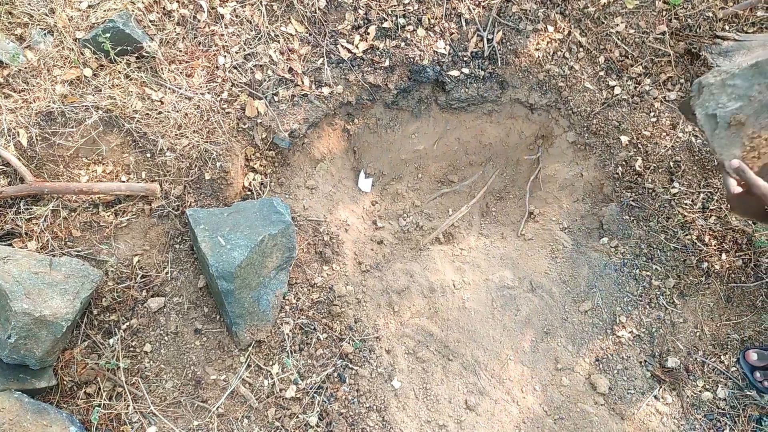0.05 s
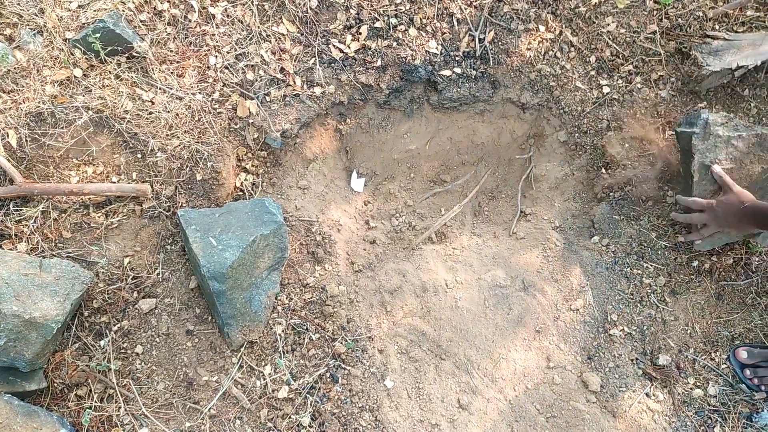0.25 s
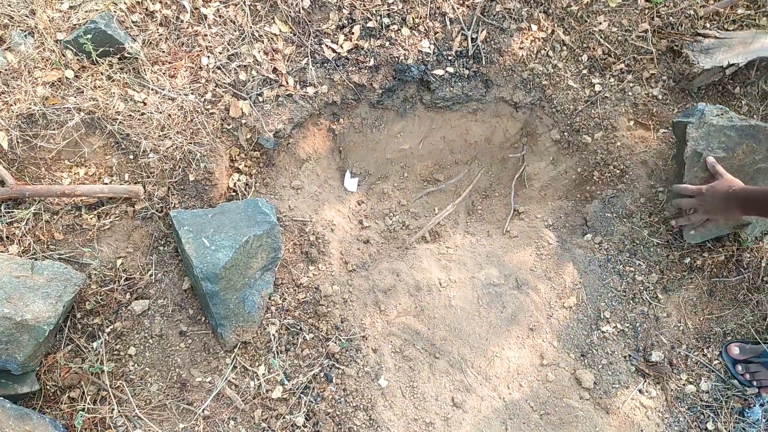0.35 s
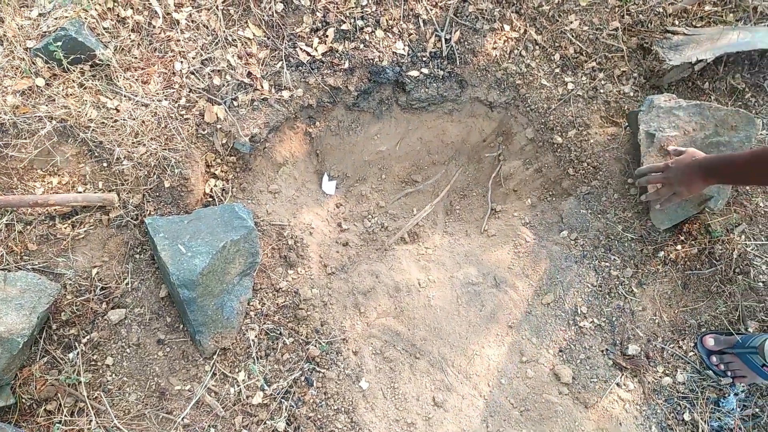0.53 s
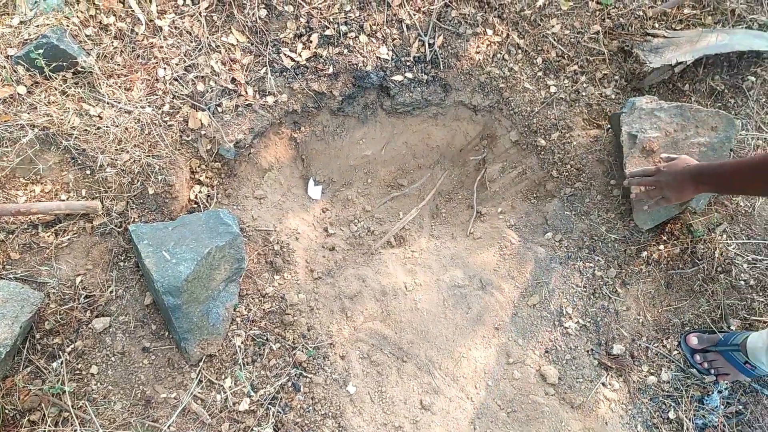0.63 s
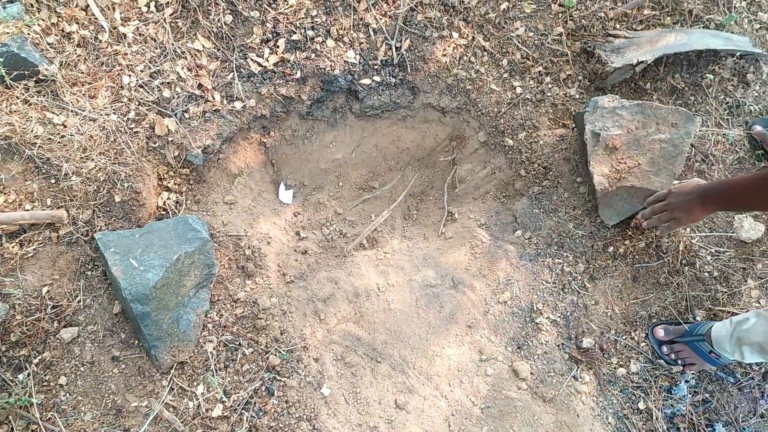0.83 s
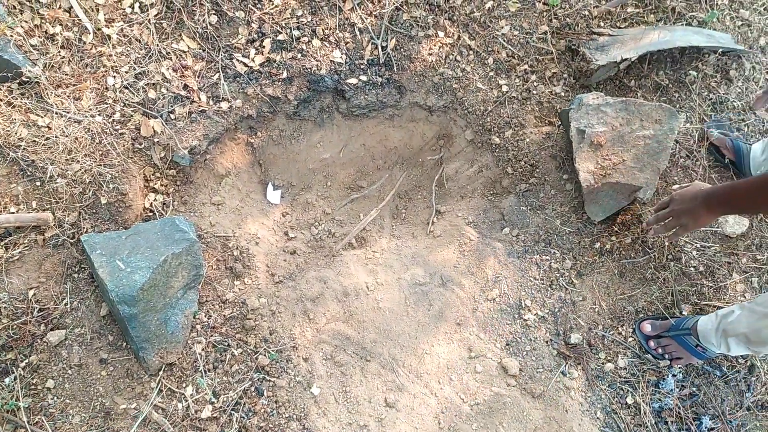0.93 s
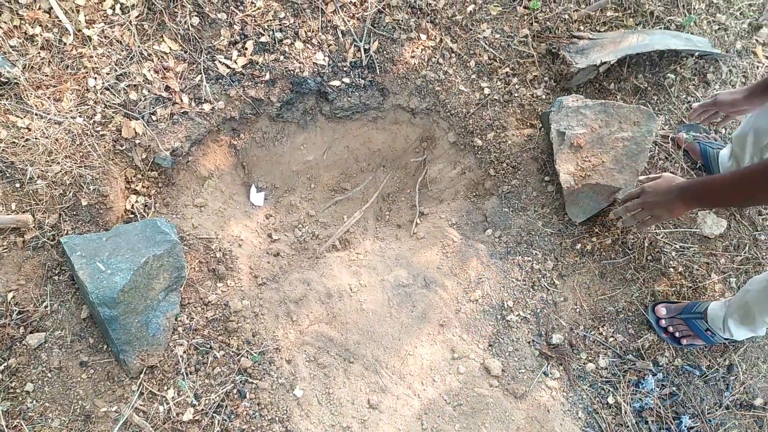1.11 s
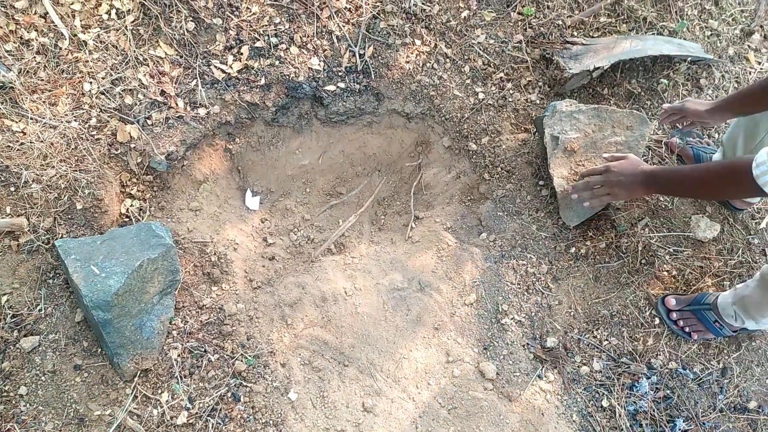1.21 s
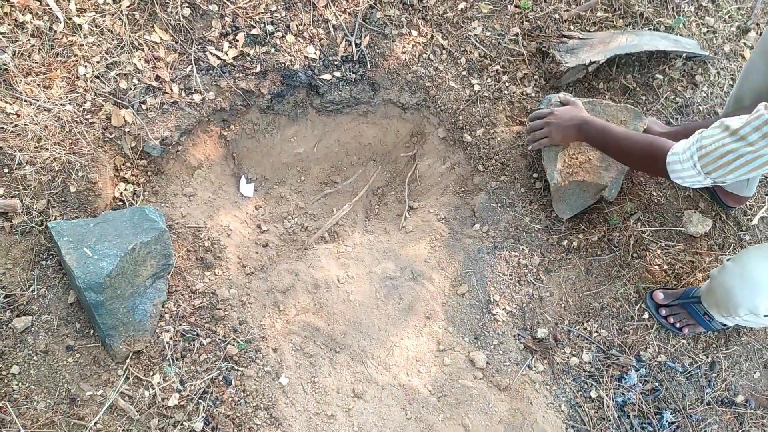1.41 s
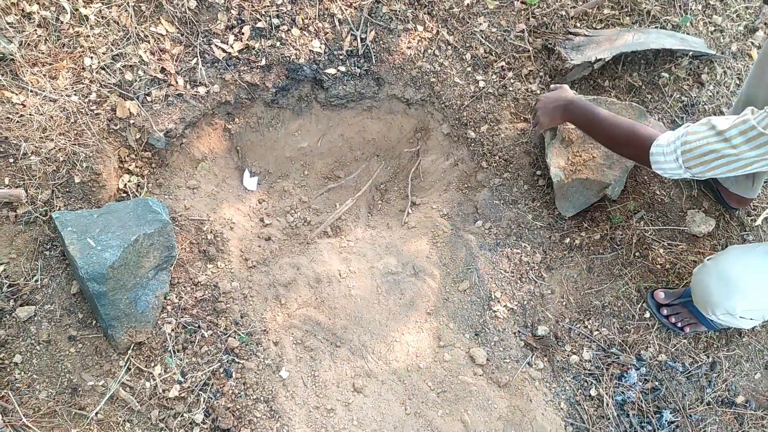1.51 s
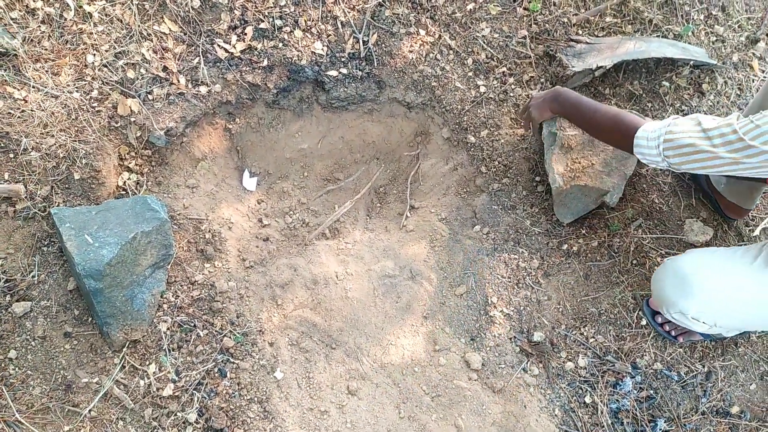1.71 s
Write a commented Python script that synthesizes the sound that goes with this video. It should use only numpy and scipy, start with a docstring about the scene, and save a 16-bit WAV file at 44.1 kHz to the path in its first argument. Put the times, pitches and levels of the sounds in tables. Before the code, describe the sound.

Outdoors, a heavy stone thuds onto dry ground near the microphone, then scuffs and knocks on pebbles amid snapping twigs and rustling leaves and cloth. Handling bumps hit the microphone right, then left, with faint birds far off.

```python
"""A crunch and a thud, close by: a heavy stone tips onto dry, leafy ground and rocks back once.
The soil gives under it and damps its ringing. As it is shifted, twigs and grit snap to the right,
pebbles clink and a foot scuffs, amid rustling leaves and cloth. Fingers bump the two microphone
ports, each touch almost only on its own side. Far off, small birds chirp over the outdoor hush."""
import sys
import numpy as np
from scipy import signal
from scipy.fft import rfft, irfft, next_fast_len
from scipy.io import wavfile
from scipy.ndimage import uniform_filter1d

SR = 44100
rng = np.random.default_rng(int(sys.argv[2]) if len(sys.argv) > 2 else 0)


def wrap_up_sound(samples):
    """Save the sound to the file named by the first command line argument, as 16-bit audio."""
    columns = np.atleast_2d(samples).T
    # keep every value between -1 and 1, then stretch to whole-number steps
    tamed = np.clip(columns, -1, 1)
    steps = np.round(tamed * 32767).astype(np.int16)
    wavfile.write(sys.argv[1], SR, steps)


N = 77175


def amp(db):
    """Decibels to gain."""
    return 10 ** (np.asarray(db) / 20)


def unit(x):
    """Scale to rms 1."""
    return x / np.sqrt(np.mean(x ** 2) + 1e-20)


def along(points, hz):
    """Read a curve of (f/Hz, value) points on a log frequency axis."""
    f, value = np.transpose(points)
    return np.interp(np.log(hz + 1), np.log(f + 1), value)


def clock():
    """Seconds at every sample."""
    return np.arange(N) / SR


def filtered(x, response):
    """Shape x by a gain given as a function of frequency."""
    size = next_fast_len(N + 8192)
    return irfft(rfft(x, size) * response(np.fft.rfftfreq(size, 1 / SR)), size)[..., :N]


def add(track, at, sound):
    """Mix a sound in at a time in seconds."""
    start = max(0, round(at * SR))
    track[..., start:] += sound[..., :N - start]


def pan(db):
    """Port gains for a level difference, left minus right."""
    return amp([[db / 2], [-db / 2]])


def strike(rise, t60):
    """Envelope of an impact: linear rise, exponential fall, both in seconds."""
    t = clock()
    return np.minimum(t / rise, 1) * amp(-60 * np.maximum(t - rise, 0) / t60)


def grains(spectrum, spiky_db, rate=1500):
    """Stereo noise of rms 1, made of tiny grains of uneven size, `rate` of them a second."""
    # likeness of the sound at the two ports: f/Hz, correlation
    likeness = [(60, 0.47), (250, 0.77), (1000, 0.49), (2500, 0.13), (10000, 0.083)]
    knots = rng.standard_normal(int(N * rate / SR) + 4)
    size = amp(spiky_db * np.interp(clock() * rate, np.arange(len(knots)), knots))

    def mid_side_gains(hz):
        width = np.arccos(np.clip(along(likeness, hz), -1, 1)) / 2
        return amp(along(spectrum, hz)) * [np.cos(width), np.sin(width)]

    mid, side = filtered(size * rng.standard_normal((2, N)), mid_side_gains)
    return unit(np.array([mid + side, mid - side]))


def push(hz, t60):
    """A soft, quickly damped low swing."""
    return -np.sin(2 * np.pi * hz * clock()) * strike(0.00226, t60)


def ring(hz, t60):
    """One damped mode."""
    return np.sin(2 * np.pi * hz * clock()) * strike(0.00041, t60)


def snap(hz, rise, spread_hz, low_cut_hz=3060):
    """A millisecond of bright ringing with unsteady pitch."""
    t = clock()
    age = t / rise
    envelope = (age / 2) ** 2 * np.exp(2 - age)
    phase_drift = np.cumsum(rng.standard_normal(N)) * np.sqrt(2 * np.pi * spread_hz / SR)
    burst = envelope * np.sin(2 * np.pi * hz * t + phase_drift)
    return filtered(burst, lambda f: f ** 2 / (f ** 2 + low_cut_hz ** 2))


def patchy(x, depth_db=2.5):
    """Narrow bands swell and fade at random."""
    bands = signal.stft(x, nperseg=512)[2]
    swell = uniform_filter1d(rng.standard_normal(bands.shape[1:]), size=3, axis=0)  # across frequency
    swell = uniform_filter1d(swell, size=9, axis=1)  # across time
    return signal.istft(bands * amp(depth_db * unit(swell)), nperseg=512)[1][:, :N]


def outdoor_hush():
    """Open air all round the microphone: a low rumble under a faint hiss."""
    # colour of the hush: f/Hz, relative level/dB
    air = [(20, 31), (70, 19), (150, 5), (300, 0), (550, 12), (800, -8.5), (1400, -35.5), (2200, -7),
           (3500, -5.5), (6000, -7.5), (9500, 0.5), (16000, -10)]
    return amp(-52) * grains(air, spiky_db=3.0)


def far_birds(chirp_s=0.05, flutter_depth=0.6):
    """Thin gliding chirps from far off, fluttering on their way through the trees."""
    # bird calls: t/s, start f/Hz, end f/Hz, level/dB
    chirps = [(.108, 4200, 4800, -47.5), (0.146, 7200, 7250, -52), (0.279, 4050, 4700, -57),
              (0.467, 4180, 4900, -53), (.605, 5040, 4200, -54), (0.668, 4200, 4800, -54),
              (0.851, 4200, 4800, -51), (1.221, 6700, 7100, -51), (1.274, 6930, 6500, -51),
              (1.435, 4000, 5200, -77)]
    out = np.zeros(N)
    progress = np.minimum(clock() / chirp_s, 1)
    for at, start_hz, end_hz, db in chirps:
        hz = start_hz + (end_hz - start_hz) * progress
        chirp = np.sin(np.pi * progress) * np.sin(2 * np.pi * np.cumsum(hz) / SR)
        flutter = 1 + flutter_depth * unit(filtered(rng.standard_normal(N), lambda f: f < 200))
        add(out, at, amp(db) * flutter * chirp)
    return out


def movement():
    """Near the microphone, leaves rustle, a hand slides and cloth shuffles as the stone is handled."""
    # loudness of leaf litter, hand and cloth: t/s, level/dB
    leaf_levels = [(0, -42.5), (.06, -42), (.18, -44), (.27, -37), (.35, -45.5), (.5, -47.5), (.6, -51.5),
                   (.85, -52.5), (1.1, -48), (1.3, -48.5), (1.4, -54), (1.75, -51.5)]
    hand_levels = [(0, -45), (.15, -46.5), (.3, -50), (.6, -55), (.82, -52.5), (.92, -47.5), (1.0, -44),
                   (1.12, -44.5), (1.2, -47.5), (1.33, -57), (1.5, -53), (1.62, -54.5), (1.75, -73)]
    cloth_levels = [(0, -43), (.15, -57.5), (.3, -57), (.42, -55.5), (.9, -60.5), (1.0, -51.5), (1.2, -46),
                    (1.28, -41.5), (1.36, -46), (1.46, -52.5), (1.75, -52.5)]
    # their colours: f/Hz, relative level/dB
    leaf_colour = [(200, 3), (1500, -1.5), (3500, -6.5), (6000, 3), (9500, 4.5), (12000, -0.5),
                   (16000, -13)]
    hand_colour = [(200, -5.5), (1400, -5), (1900, 5), (2800, 2.5), (3700, -0.5), (4300, 2.5), (5200, 1),
                   (6200, -30), (16000, -21)]
    cloth_colour = [(30, -11.5), (120, -3.5), (270, 4), (700, -4.5), (1150, -1), (1600, -9), (2600, 1.5),
                    (4000, -21), (16000, -40)]
    gain = lambda levels: amp(np.interp(clock(), *np.transpose(levels)))
    leaves = gain(leaf_levels) * grains(leaf_colour, spiky_db=3, rate=980)
    hand = gain(hand_levels) * grains(hand_colour, spiky_db=3)
    cloth = gain(cloth_levels) * grains(cloth_colour, spiky_db=4, rate=200)
    return patchy(leaves + hand + cloth)


def fingers_on_ports(crosstalk_db=-27):
    """Handling noise on the microphone: each touch is heard almost only in the port next to it."""
    # finger bumps: t/s, rasp level/dB, rasp t60/s, port (0 left, 1 right),
    # push f/Hz, push level/dB, rasp dull above f/Hz
    bumps = [(1.1285, -27.5, 0.028, 1, 202, -24.5, 900), (1.142, -37, 0.05, 1, 158, -21, 700),
             (1.22, -25, 0.015, 1, 206, -36, 6000), (1.2235, -16.5, 0.015, 1, 223, -20, 9000),
             (1.237, -25, 0.05, 1, 130, -22, 5000), (1.246, -18, 0.015, 1, 376, -17.5, 2200),
             (1.252, -30, 0.15, 1, 192, -22.5, 3000), (1.363, -47, 0.056, 0, 90, -33, 600),
             (1.386, -25.5, 0.0061, 0, 297, -33.5, 6000), (1.4169, -29, 0.015, 0, 312, -43, 3000),
             (1.572, -38, 0.026, 1, 166, -39.5, 1000)]
    # fingernail clicks at the left port: t/s, level/dB, f/Hz
    clicks = [(1.3828, -12.5, 10500), (1.3858, -20, 4300), (1.4078, -32, 10400), (1.4128, -27, 10400),
              (1.4151, -9.5, 10630)]
    # colours of the touched case and of the nail: f/Hz, relative level/dB
    case = [(50, -7), (220, -0.5), (600, 0.5), (850, -5), (1500, -4.5), (2400, -1), (3300, -17),
            (6000, -37), (16000, -28)]
    nail = [(200, -11), (1500, -2), (4000, 1.5), (8000, -3), (16000, -20)]
    out = np.zeros((2, N))
    for at, db, t60, port, hz, push_db, dull_hz in bumps:
        friction = grains(case, spiky_db=0.5)[0]
        dulled = unit(filtered(friction, lambda f: 1 / np.hypot(1, f / dull_hz)))
        rasp = amp(db) * strike(0.00048, t60) * dulled
        add(out[round(port)], at, rasp + amp(push_db) * push(hz, t60=0.023))
    for at, db, hz in clicks:
        body = amp(-16) * strike(0.00018, t60=0.0082) * grains(nail, spiky_db=4.5)[0]
        tick = snap(hz, rise=0.0002, spread_hz=2400)
        add(out[0], at, amp(db) * (tick + body))
    return out + amp(crosstalk_db) * out[::-1]


def ground_scatter(hz, rise):
    """The ground's brief answer to a snap: a tail of noise around its pitch."""
    band = lambda f: 1 / np.hypot(1, 1.8 * (f / hz - hz / (f + 1)))
    noise = unit(filtered(rng.standard_normal(N), band))
    return amp(-14) * noise * strike(rise, t60=0.019)


def twigs(rise_s=0.00019, left_lag_s=0.00036, left_db=-5.5):
    """Twigs and grit snap to the right, reaching the left port later and weaker."""
    # snaps at the right port: t/s, level/dB, f/Hz
    snaps = [(0.06, -31, 8950), (0.109, -37, 9400), (.2468, -21, 9150), (.277, -23, 9800),
             (0.2906, -23, 7640), (0.3061, -20, 9300), (.4195, -27, 9200), (.464, -36, 9600),
             (.4895, -29.5, 9700), (0.6312, -23, 9200), (0.664, -25.5, 9900), (0.6713, -27, 9900),
             (0.7025, -21, 9560), (0.7138, -22, 8600), (0.7139, -17.5, 8100), (0.7405, -17.5, 7040),
             (.7657, -20, 9450), (0.7832, -13.5, 9380), (0.8048, -17, 9600), (.8255, -19, 8660),
             (0.838, -21, 8800), (0.8442, -28, 9000), (0.8467, -20.5, 9000), (1.179, -35, 10100),
             (1.2996, -29, 10400)]
    out = np.zeros((2, N))
    for at, db, hz in snaps:
        tick = snap(hz, rise_s, spread_hz=1620)
        add(out[0], at + left_lag_s, amp(db + left_db) * (tick + ground_scatter(hz, rise_s)))
        add(out[1], at, amp(db) * (tick + ground_scatter(hz, rise_s)))
    return out


def stone_ringing(spread_db=1.5):
    """Stone and pebbles ring briefly in the centre, damped by the soil."""
    # the stone's edges strike: t/s, level/dB
    strikes = [(0.1959, -42.5), (.2015, -25.5), (.209, -24), (0.2134, -27)]
    # modes of stone and packed soil: f/Hz, relative level/dB, t60/s
    modes = [(216, 0, 0.052), (338, -4, .07), (383, -3.5, .06), (621, -7, 0.079), (730, -13, 0.056),
             (900, -5, 0.043), (1117, -9, 0.056), (1726, -9, 0.052), (1870, -25, 0.03)]
    # pebbles clink: t/s, level/dB, f/Hz, t60/s
    clinks = [(.7949, -28, 2215, 0.026), (0.7954, -40, 1090, 0.021), (1.2625, -28, 1096, .02),
              (1.281, -27, 1110, 0.023)]
    out = np.zeros(N)
    for at, db in strikes:
        for hz, mode_db, t60 in modes:
            add(out, at, amp(db + mode_db + rng.normal(0, spread_db)) * ring(hz, t60))
    for at, db, hz, t60 in clinks:
        add(out, at, amp(db) * ring(hz, t60))
    return out


def stone_on_ground():
    """Close to the microphone, the stone thuds, crushes the soil, scuffs and knocks on pebbles."""
    # the soil gives under the stone: t/s, level/dB, f/Hz, t60/s
    thuds = [(0.2033, -18, 206, 0.028), (0.2062, -23, 114, 0.01), (0.218, -16, 260, 0.0177),
             (0.23, -12, 72, 0.1), (0.2292, -26.5, 115.7, 0.14), (0.312, -41, 71, .2),
             (0.516, -41.5, 193, 0.14), (0.5308, -27.5, 68, 0.13)]
    # soil is crushed: t/s, level/dB, rise/s, t60/s
    crushes = [(.200, -26.5, 0.0015, 0.057), (.209, -22.5, 0.0017, 0.066), (0.266, -43.5, .012, 0.11),
               (.512, -43.5, 0.0036, 0.21)]
    # gritty scuffs: t/s, level/dB, rise/s, t60/s, left minus right/dB
    scuffs = [(0.019, -39, 0.0069, 0.11, -6), (.058, -35.5, .003, 0.077, 0),
              (.194, -26.5, 0.006, 0.076, -2.5), (.209, -27, 0.00089, 0.048, -1),
              (0.809, -42, 0.019, 0.33, 0), (1.053, -42, 0.007, 0.25, -2), (1.22, -36, 0.0023, 0.12, -6),
              (1.237, -35.5, 0.0033, 0.22, -3.5), (1.52, -41.5, 0.0077, .04, -12),
              (1.575, -51.5, 0.016, 0.066, -19.5)]
    # hard knocks against pebbles: t/s, level/dB, t60/s, left minus right/dB
    knocks = [(0.7946, -29, 0.048, 0), (1.281, -45, 0.02, 3), (1.316, -42, 0.014, -2),
              (1.572, -43, 0.19, 2), (1.736, -46, 0.023, -10), (1.742, -38.5, 0.022, -2)]
    # colours of the ground's materials: f/Hz, relative level/dB
    soil = [(30, 7), (100, -17), (220, -8), (380, 4.5), (500, -4), (800, -5), (950, 2.5), (1400, -30),
            (1750, -3.5), (2200, -18), (4000, -40), (16000, -41)]
    grit = [(200, -51), (1500, -9.5), (3300, -1.5), (5000, 2.5), (8800, 5), (12000, 0.5), (16000, -10)]
    pebble = [(60, -13), (280, 3.5), (700, -13.5), (1100, 1.5), (1800, -2.5), (2250, 7.5), (3000, -11),
              (5000, -16), (8000, -3.5), (16000, -16.5)]
    out = np.zeros((2, N))
    for at, db, hz, t60 in thuds:
        add(out, at, amp(db) * push(hz, t60))
    for at, db, rise, t60 in crushes:
        add(out, at, amp(db) * strike(rise, t60) * grains(soil, spiky_db=2))
    for at, db, rise, t60, side_db in scuffs:
        add(out, at, amp(db) * pan(side_db) * strike(rise, t60) * grains(grit, spiky_db=4))
    for at, db, t60, side_db in knocks:
        add(out, at, amp(db) * pan(side_db) * strike(0.00054, t60) * grains(pebble, spiky_db=5.5))
    return out


def scene():
    """The stone and the handling up close, the birds and the hush behind them."""
    close = stone_on_ground() + stone_ringing() + twigs() + fingers_on_ports() + movement()
    return close + far_birds() + outdoor_hush()


def record(dry, low_cut_hz=23.4, top_hz=16000):
    """The microphone: each port has its own resonances; deep bass is thinned, the top cut off."""
    # colour of each port: f/Hz, gain/dB
    left_port = [(100, 0), (1500, -2), (2200, -3.5), (3000, 1.5), (3800, -1.5), (4400, 1), (6000, -1.5),
                 (8500, -1), (10400, 3.5), (12000, 0.5), (16000, -3.5)]
    right_port = [(100, 0.5), (1500, -1), (1900, 1), (2180, 6.5), (2550, -3.5), (3200, -8.5), (3800, -1.5),
                  (4300, 2), (6000, -2), (7800, 0), (9300, 3), (10500, 0), (12000, -15), (16000, -3)]
    peak_hz, half_width_hz, peak_db = 2250, 36, 2  # narrow resonance of the right port

    def response(hz):
        resonance_db = peak_db / (1 + ((hz - peak_hz) / half_width_hz) ** 2)
        ports = amp([along(left_port, hz), along(right_port, hz) + resonance_db])
        low_cut = hz ** 2 / (hz ** 2 + low_cut_hz ** 2)
        return ports * low_cut * (hz < top_hz)

    return filtered(dry, response)


dry = scene()
out = record(dry)
wrap_up_sound(out)
```